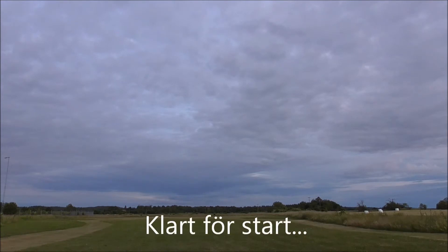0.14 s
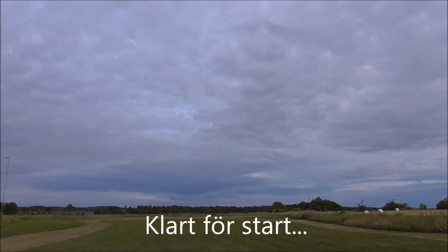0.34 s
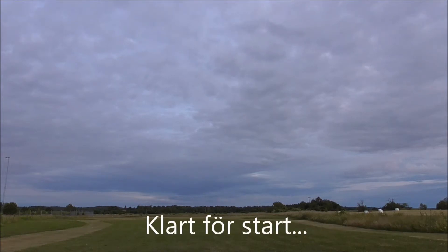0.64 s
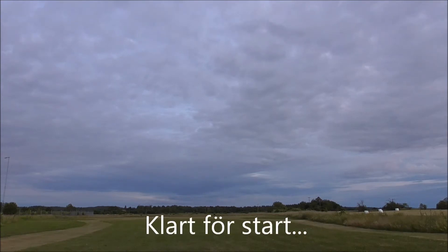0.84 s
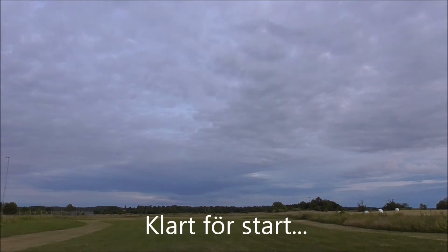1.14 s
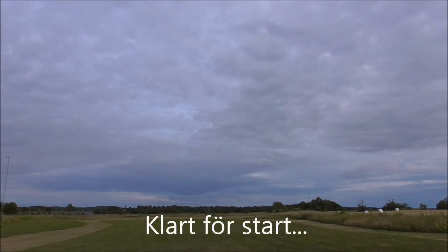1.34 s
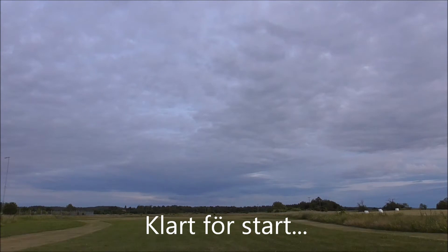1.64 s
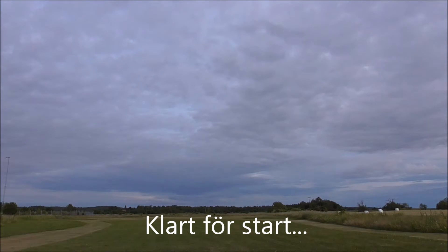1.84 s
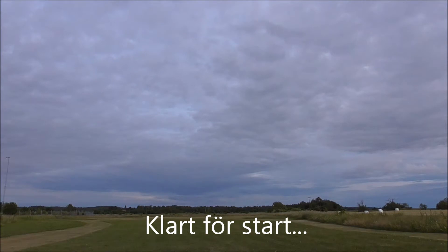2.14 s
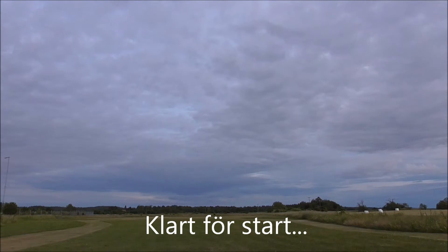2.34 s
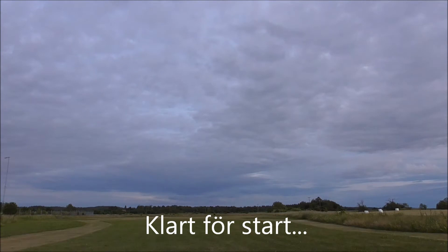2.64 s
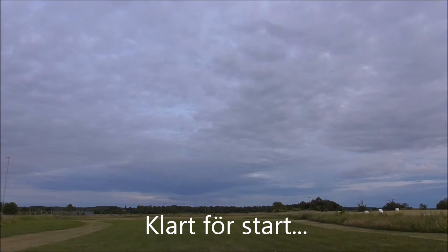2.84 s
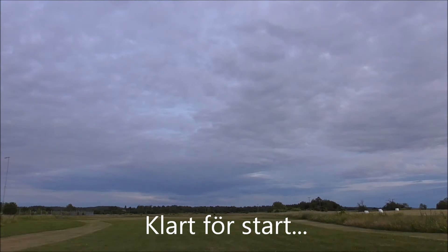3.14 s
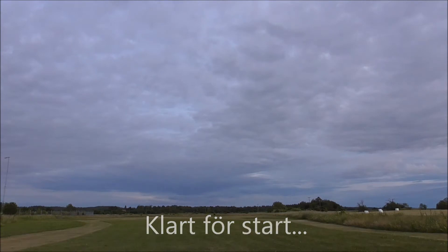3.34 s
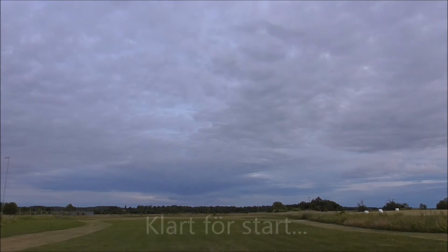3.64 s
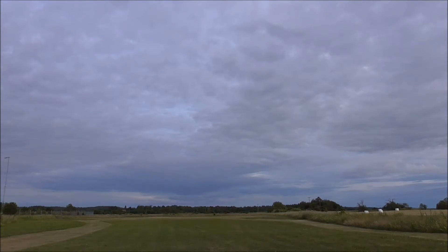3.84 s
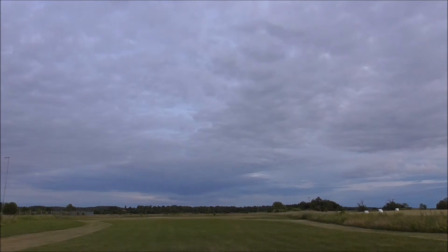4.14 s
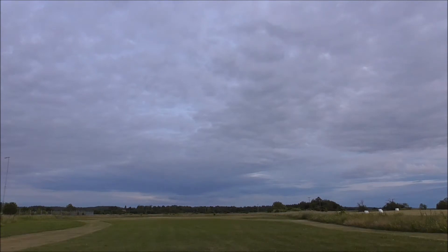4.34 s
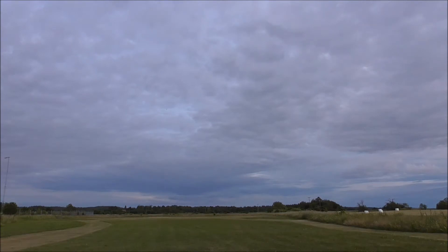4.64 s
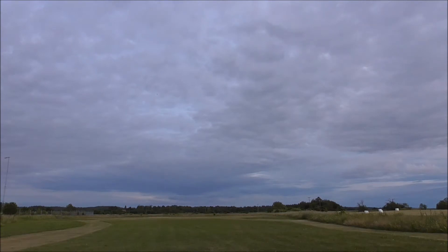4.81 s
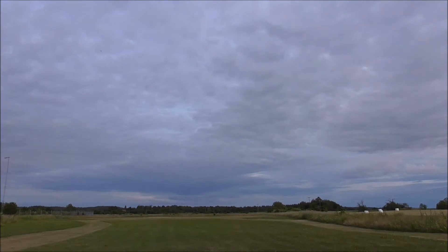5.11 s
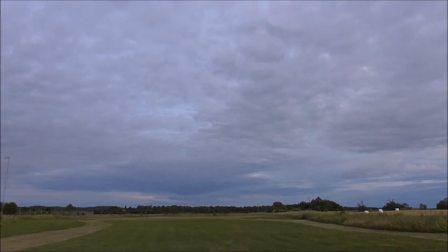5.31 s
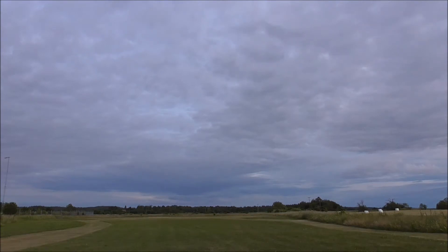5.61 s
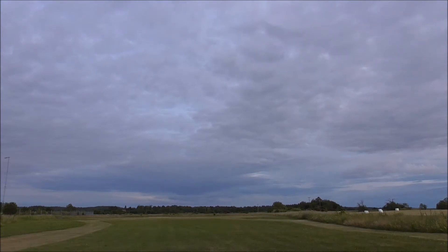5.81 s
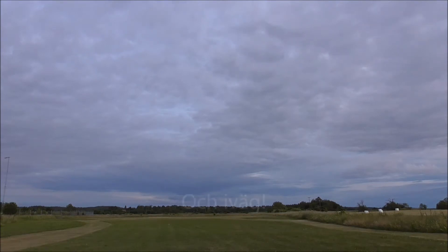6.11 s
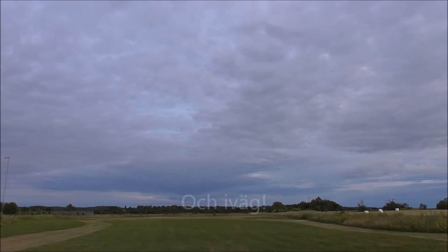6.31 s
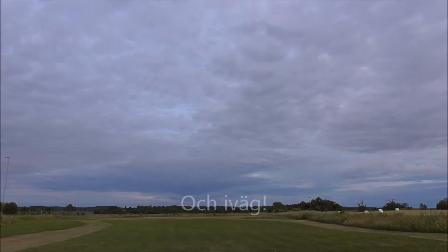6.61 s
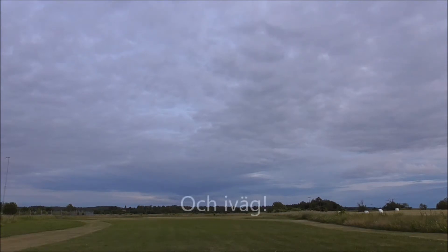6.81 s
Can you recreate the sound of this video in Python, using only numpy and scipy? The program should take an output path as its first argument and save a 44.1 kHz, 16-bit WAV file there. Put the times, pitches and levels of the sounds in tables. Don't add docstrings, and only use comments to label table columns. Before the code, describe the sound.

A close stereo microphone hears a foam-bodied model jet on a quiet field. Over low traffic hum and high servo buzz come faint taps, then a short growling fan blip that whines down and brakes abruptly. The fan restarts with ticking and cogging growl, rises through several steps with brief body resonances, and settles into a strong, slowly rising whine and broadband rush.

```python
import sys
import numpy as np
from scipy import signal
from scipy.fft import rfft, irfft, next_fast_len
from scipy.io import wavfile
from scipy.ndimage import uniform_filter1d, map_coordinates

SR = 44100
rng = np.random.default_rng(int(sys.argv[2]) if len(sys.argv) > 2 else 0)


def transcribe(u):
    v = np.clip(np.atleast_2d(u).T, -1, 1)
    q = np.round(v * 32767).astype(np.int16)
    wavfile.write(sys.argv[1], SR, q)


def volts_from_decibels(level):
    exponent = np.asarray(level, float) / 20
    return 10 ** exponent


N = 306936
T = np.arange(N) / SR

# f/Hz, level/dB
TRAFFIC_SPECTRUM = [(25, -33), (60, -3), (200, -3.5), (460, -5), (640, -5), (800, -5.5), (930, 4),
                    (1050, -11), (1200, -11.5), (1550, -11.5), (1750, -18), (2600, -21.5), (6300, -25),
                    (16000, -17)]
# f/Hz, level/dB
SERVO_SPECTRUM = [(6300, -27), (6900, 1.5), (7500, -0.5), (9500, 1.5), (11600, -12), (12500, -5),
                  (14500, -31), (16000, -16.5)]
# t/s, level/dB, f/Hz, t60/s
TAPS = [
    (.141, -44.5, 476, 0.054),
    (.43, -48, 485.2, 0.0476),
]
# t/s, level/dB
KICKS = [(.868, -45), (.955, -50), (1.04, -47), (1.085, -45), (1.214, -34), (1.238, -38), (1.262, -37),
         (2.021, -33), (2.047, -34), (2.07, -39), (2.785, -45), (2.83, -46), (2.865, -43), (2.9, -45)]
# start t/s, end t/s, start f/Hz, end f/Hz, level/dB
SINGING_PANELS = [
    (1.187, 1.24, 407, 423, -43.5),
    (1.21, 1.313, 740, 734, -44.5),
    (0.987, 1.183, 740, 764, -50),
    (2.05, 2.276, 750, 740, -67),
    (2.928, 3.09, 730, 746, -54),
    (3.066, 3.165, 414, 423, -53.5),
    (3.115, 3.147, 740, 790, -35.5),
    (3.819, 3.87, 960, 780, -34),
    (4.342, 4.45, 725, 772, -29),
]
# f/Hz, width/Hz, level/dB
SHELL_MODES = [(415, 60, -5), (765, 60, 0), (960, 120, -5), (1230, 80, -1), (2600, 2500, -27)]
# t/s, new shaft f/Hz, time taken/s
SPEED_STEPS = [(.823, 99, .4), (1.19, 231.2, .165), (1.2, 349.5, .36), (1.665, 150.6, .336),
               (1.987, 0, .041), (2.8, 119.1, .39), (3.096, 266.7, .295), (3.313, 344.7, .253),
               (3.653, 399.7, .255), (4.022, 464.8, .181), (4.481, 513.4, .166), (4.871, 534.6, .161),
               (5.09, 580.7, .181), (5.587, 599, .064), (6.202, 621.5, .082)]
# power on t/s, rotor caught t/s, power cut t/s, load level/dB
POWERED_RUNS = [
    (.87, 1.207, 1.74, -5),
    (2.79, 3.122, 7.5, 0),
]
# f/Hz, level/dB per Hz
ROAR_SLOW = [(30, -52), (90, -26), (200, -15), (320, -6), (490, 3), (620, -5), (800, 0.5), (950, -9),
             (1175, -9), (1500, -7), (1900, -15), (2300, -27)]
# f/Hz, level/dB per Hz
ROAR_FAST = [(30, -58), (90, -31.5), (200, -22), (300, -11), (450, -8), (550, -1), (730, -2), (880, -1.5),
             (1050, -15), (1175, -13.5), (1450, -10.5), (1750, -24.5), (2100, -43)]
# f/Hz, level/dB
DUCT_SPECTRUM = [(1400, -33), (1950, -3.5), (2300, 2.5), (3050, 2), (3600, 1.5), (4500, 3.5), (5650, -2.5),
                 (6500, -7.5), (7500, -24)]
# f/Hz, level/dB
NOZZLE_SPECTRUM = [(5200, -47), (6300, -2.5), (7400, -4.5), (8200, 1), (9200, 0.5), (9700, 0.5),
                   (10800, -4.5), (12000, -3.5), (13500, -6.5), (14500, -6), (16000, -31)]
# shaft multiple, level/dB
COG_ORDERS = [(6, -9), (9, 0), (12, -9), (15, -13), (18, -1), (24, -15), (27, -10), (36, -9), (54, -17)]
# shaft multiple, level/dB
FAST_SIDEBANDS = [(-6, -3), (-12, -2), (-18, -11), (0, 0)]
# shaft multiple, level/dB
SLOW_CHOP_SIDEBANDS = [(9, -20), (18, -15), (-9, -18)]
# f/Hz, level/dB
CHOP_HISS = [(3500, -40), (4500, -12), (6600, -4), (8700, 3), (9800, 0), (11000, -10), (15000, -16)]
# shaft f/Hz, level/dB
COG_LEVEL = [(5, -67), (20, -47.5), (60, -42), (90, -37.5), (180, -35), (290, -37.5), (360, -60),
             (460, -62)]
# shaft f/Hz, level/dB
FAST_CHOP_LEVEL = [(5, -70), (22, -64), (45, -56), (60, -48), (88, -60), (200, -56), (360, -54), (450, -75)]
# shaft f/Hz, level/dB
SLOW_CHOP_LEVEL = [(90, -38.5), (350, -38.5), (460, -31), (515, -40.5), (585, -41), (622, -58)]
# f/Hz, width/Hz, level/dB
MOUNT_MODES = [(309, 39, -35), (345, 75, -39.5), (385.5, 27, -28), (473, 21.7, -16.5), (496.7, 34, -20.5),
               (587, 30.5, -20.5), (645, 32, -33.5)]
# shaft f/Hz, level/dB
BLADE_LEVEL = [(90, -79), (150, -49.5), (340, -51.5), (415, -47), (535, -39.5), (580, -46.5), (597, -39),
               (622, -38)]
# shaft f/Hz, level/dB
POLE_LEVEL = [(100, -72), (300, -52), (365, -33.5), (402, -43), (460, -32), (535, -32), (598, -47),
              (620, -41.5)]
# shaft f/Hz, level/dB
FOURTH_BLADE_LEVEL = [(200, -86), (350, -76), (385, -56), (410, -62), (465, -45), (530, -42), (600, -45),
                      (622, -44)]
# shaft multiple, level/dB at 600 Hz, duct mode f/Hz, width/Hz
WEAK_ORDERS = [(2, -38, 1065, 60), (3, -42, 1380, 130), (10, -44, 4000, 200), (12, -58, 3300, 700),
               (15, -35, 9400, 1200), (24, -46, 9200, 1000), (27, -46, 9200, 1000), (24, -53, 14950, 400)]
# f/Hz, phase/rad
PORT_LEAD = [(0, 0), (350, 1), (1400, 1.3), (2400, 1.2), (4500, 1.7), (5500, 2.5), (7600, 2.9), (9700, 3.1),
             (10700, 4.1), (11700, 5.4), (12800, 6.1), (14300, 6.7), (16000, 6.6)]
# f/Hz, level/dB
PORT_TILT = [(300, -1), (800, 2), (1175, 7), (1900, 8), (3600, 5), (5000, 2), (7700, 5), (8400, 1),
             (9500, -3), (10200, -6), (10850, -11), (12500, -7), (13500, -4), (15000, -2)]
# f/Hz, coherence
PORT_COHERENCE = [(60, .6), (150, .7), (800, .85), (1900, .55), (2900, .7), (5500, .5), (7000, .65),
                  (9000, .88), (10700, .48), (13000, .6)]


def unit(x):
    return x / np.sqrt(np.mean(x ** 2) + 1e-20)


def along(points, hz):
    f, value = np.transpose(points)
    return np.interp(np.log(hz + 1), np.log(f + 1), value)


def wobble(rate):
    knots = rng.standard_normal(int(N * rate / SR) + 4)
    return map_coordinates(knots, [T * rate])


def filtered(x, response):
    m = next_fast_len(N + SR // 2)
    hz = np.fft.rfftfreq(m, 1 / SR)
    return irfft(rfft(x, m) * response(hz), m)[..., :N]


def rush(spectrum, patchy_db, gate=1):
    z = signal.stft(rng.standard_normal((2, N)), nperseg=512)[2]
    field = uniform_filter1d(rng.standard_normal(z.shape[1:]), 6, 0)
    field = uniform_filter1d(field, 10, 1)
    pair = signal.istft(z * volts_from_decibels(patchy_db * unit(field)), nperseg=512)[1][:, :N]
    return unit(filtered(pair * gate, lambda hz: volts_from_decibels(along(spectrum, hz))))


def tone(hz, db, flutter_db=-2.5, drift=0.18):
    phase = 2 * np.pi * np.cumsum(hz) / SR + drift * wobble(30)
    level = np.sqrt(2) * volts_from_decibels(db + flutter_db * wobble(22))
    return level * np.sin(phase) * (hz < SR / 2.2)


def airframe(x):
    def response(f):
        total = 0
        for k, (center, width, db) in enumerate(SHELL_MODES):
            damping = 1j * f * width
            total = total + (-1) ** k * volts_from_decibels(db) * damping / (center * center - f * f + damping)
        return total
    return filtered(x, response)


def controls():
    inertia_s, release_db_s = .041, 194
    coast_drop_db = -13
    ease_s, ease_grows = .4, 3.5
    start, hz, took = np.transpose(SPEED_STEPS)
    steps = zip(start, np.diff(hz, prepend=0), took)
    demand = sum(change * np.clip((T - a) / b, 0, 1) for a, change, b in steps)
    keep = np.exp(-1 / (inertia_s * SR))
    shaft = np.abs(signal.lfilter([1 - keep], [1, -keep], demand))
    ahead = np.clip((demand - shaft) / (shaft + 20), -.3, .3)
    run = np.clip(np.searchsorted([r[0] for r in POWERED_RUNS], T) - 1, 0, None)
    on, caught, cut, load_db = np.array(POWERED_RUNS)[run].T
    power_db = np.where(T > on, -release_db_s * np.clip(T - cut, 0, None), -120)
    caught_db = np.where(T > caught, power_db + load_db, -120)
    coasting = (T > cut) * (ahead > -.2) * 1.
    coast_db = coast_drop_db * uniform_filter1d(coasting, SR // 50)
    pole_db = ease_grows * load_db * np.clip((T - caught) / ease_s, 0, 1) ** 3
    return shaft, ahead, power_db, caught_db, coast_db, pole_db


def traffic():
    return volts_from_decibels(-59.0 + 0.91 * wobble(2.1)) * rush(TRAFFIC_SPECTRUM, patchy_db=1.0)


def servo():
    burst = .35 + np.clip(np.sin(2 * np.pi * 50 * T + 3.1) + .3, 0, 1)
    return volts_from_decibels(-65.5) * rush(SERVO_SPECTRUM, patchy_db=1.0, gate=burst)


def taps():
    out = np.zeros(N)
    for s, db, hz, t60 in TAPS:
        t = np.clip(T - s, 0, None)
        envelope = volts_from_decibels(db + 9.0 - 60 * t / t60) * (1 - np.exp(-t / 0.006))
        out += envelope * np.sin(2 * np.pi * hz * t)
    return out


def rotor_kicks():
    kicks = np.zeros(N)
    for s, db in KICKS:
        kicks[round(s * SR):][:24] = volts_from_decibels(db + 16) * np.hanning(24)
    return airframe(kicks)


def singing_panels():
    out = np.zeros(N)
    for start, end, from_hz, to_hz, db in SINGING_PANELS:
        u = np.clip((T - start) / (end - start), 0, 1)
        envelope = np.sqrt(np.abs(np.sin(np.pi * u))) * (u < 1)
        out += envelope * tone(from_hz + (to_hz - from_hz) * u, db)
    return out


def jet(shaft, ahead, caught_db):
    running = np.clip((shaft - 80) / 20, 0, 1)
    octaves = np.log2(shaft / 600 + 1e-3)

    def flow(db, octave_db, push_db, crawl_db, gate_db):
        driven = running * volts_from_decibels(db + octave_db * octaves + push_db * ahead)
        return np.hypot(driven, volts_from_decibels(crawl_db + gate_db))

    turning = np.clip(uniform_filter1d(shaft, SR // 16) / 14 - .2, 0, 1)
    full = np.pi / 2 * np.clip((shaft - 500) / 110, 0, 1)
    swell = .5 * wobble(6)
    roar = np.cos(full) * rush(ROAR_SLOW, patchy_db=1.6) + np.sin(full) * rush(ROAR_FAST, patchy_db=1.6)
    body = flow(-24.5, 13, -2, -51.5, gate_db=-1) * volts_from_decibels(swell - 2.0) * roar
    duct = flow(-28, 20, 24, -56.5, gate_db=caught_db) * volts_from_decibels(swell - 3.5)
    duct = duct * rush(DUCT_SPECTRUM, patchy_db=1.4)
    nozzle = flow(-33, 23, 38, -57, gate_db=caught_db) * volts_from_decibels(swell + 2.5)
    nozzle = nozzle * rush(NOZZLE_SPECTRUM, patchy_db=2.5)
    return turning * (body + duct + nozzle)


def cogging(shaft, coast_db):
    level_db = along(COG_LEVEL, shaft) + coast_db
    ripple = sum(tone(k * shaft, level_db + db + 1.5 * wobble(45), flutter_db=5) for k, db in COG_ORDERS)
    return airframe(ripple) * (shaft > 1)


def chopper(shaft, power_db, caught_db):
    chop_hz = 7600 + 250 * np.exp(-shaft / 300)
    fast_db = along(FAST_CHOP_LEVEL, shaft) + power_db
    slow_db = along(SLOW_CHOP_LEVEL, shaft) + caught_db
    free_db = -14 * np.clip(shaft / 90 - 1, 0, 1)
    fast = sum(tone(2 * chop_hz + k * shaft, fast_db + db + free_db * (k != 0)) for k, db in FAST_SIDEBANDS)
    slow = tone(chop_hz, slow_db, flutter_db=.8, drift=.1)
    strain_db = -18 * np.clip(shaft / 140 - .8, 0, 2)
    for k, db in SLOW_CHOP_SIDEBANDS:
        slow += tone(chop_hz + k * shaft, slow_db + db + strain_db, flutter_db=4)
    hiss = volts_from_decibels(slow_db - 9) * rush(CHOP_HISS, patchy_db=1.5)[0]
    return fast + slow + hiss


def rotor(shaft, coast_db, pole_db):
    stiff_hz, stiff_db = 300, 17
    shake = sum(volts_from_decibels(db) ** 2 / (1 + ((shaft - hz) / w) ** 2) ** 2 for hz, w, db in MOUNT_MODES)
    once_db = 10 * np.log10(shake) + stiff_db * np.log2(np.clip(shaft / stiff_hz, .01, 1))
    rough = np.clip((shaft - 560) / 60, 0, 1)
    fast = np.clip((shaft - 100) / 30, 0, 1)
    lines = tone(shaft, once_db + 1.1 * rough * wobble(60), flutter_db=-0.8, drift=0.084)
    blade_db = along(BLADE_LEVEL, shaft) + coast_db / 2 + 2 * wobble(50) + 3 * wobble(8)
    lines += tone(5 * shaft, blade_db, flutter_db=2, drift=.9)
    lines += tone(18 * shaft, along(POLE_LEVEL, shaft) + pole_db, flutter_db=2.5)
    lines += tone(20 * shaft, along(FOURTH_BLADE_LEVEL, shaft))
    for k, db, mode_hz, width_hz in WEAK_ORDERS:
        near = 1 / (1 + ((k * shaft - mode_hz) / width_hz) ** 2)
        lines += near * shaft / 600 * tone(k * shaft, db + coast_db + 3.2 * wobble(7))
    return fast * lines


def ports(direct, air):
    def spread(hz):
        angle = np.arccos(np.clip(along(PORT_COHERENCE, hz), -1, 1)) / 2
        return [np.cos(angle), np.sin(angle)]

    def left_right(hz):
        lead = np.interp(hz, *np.transpose(PORT_LEAD))
        half = volts_from_decibels(along(PORT_TILT, hz) / 2) * np.exp(.5j * lead)
        return [half, 1 / half]

    mid, side = filtered(air, spread)
    return filtered(np.array([direct + mid + side, direct + mid - side]), left_right)


def scene():
    shaft, ahead, power_db, caught_db, coast_db, pole_db = controls()
    surroundings = traffic() + servo()
    direct = taps() + rotor_kicks() + singing_panels()
    air = jet(shaft, ahead, caught_db)
    direct += cogging(shaft, coast_db) + chopper(shaft, power_db, caught_db)
    direct += rotor(shaft, coast_db, pole_db)
    return ports(direct, air) + surroundings


def top_cut(x):
    return signal.sosfilt(signal.butter(12, 16610, fs=SR, output="sos"), x)


def record(dry):
    mix = filtered(dry, lambda hz: hz < 15750)
    return top_cut(mix)


dry = scene()
out = record(dry)
transcribe(out)
```